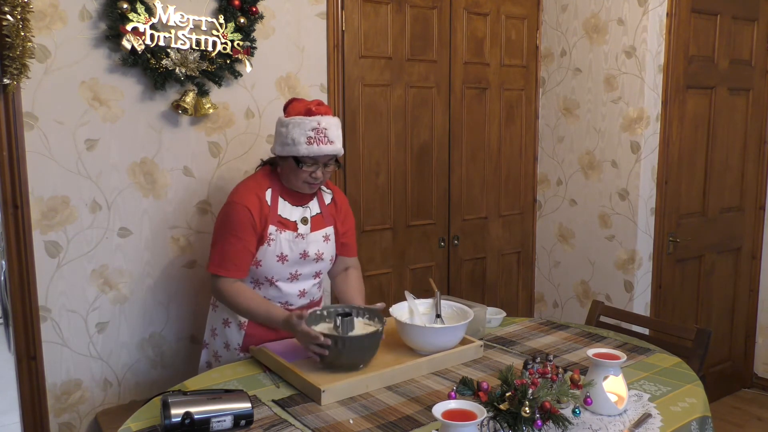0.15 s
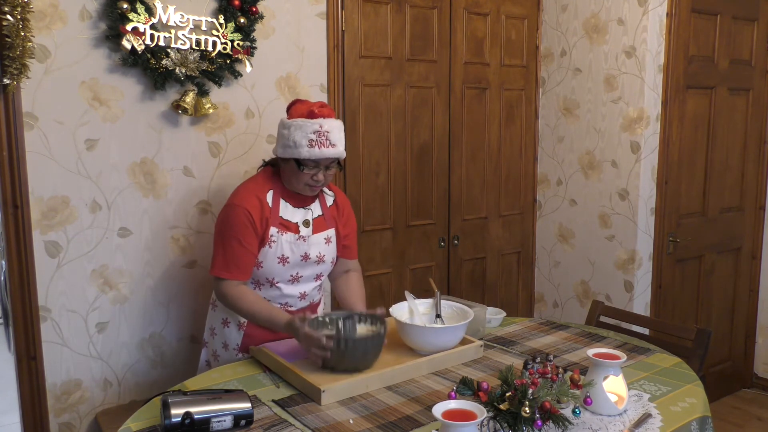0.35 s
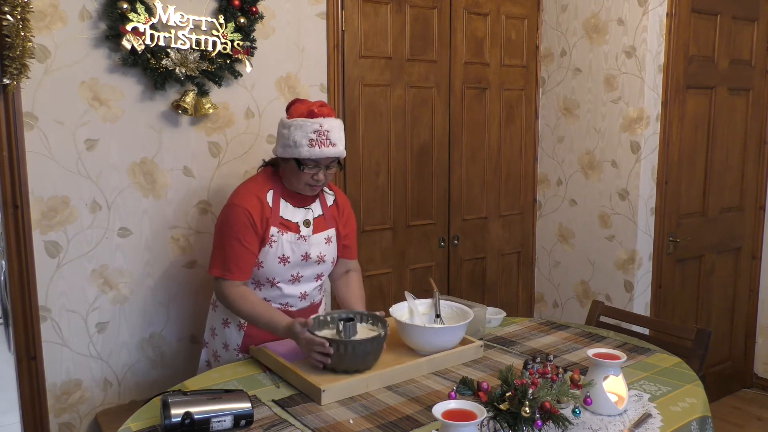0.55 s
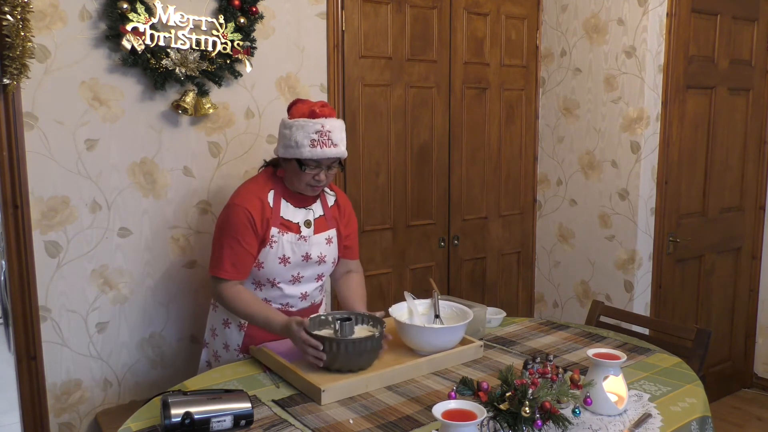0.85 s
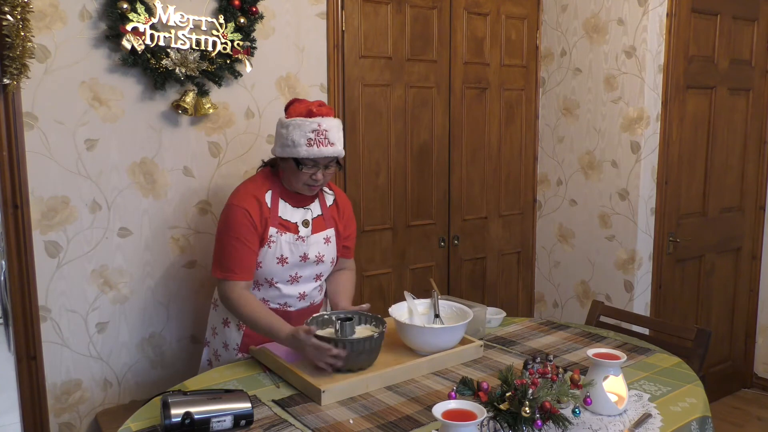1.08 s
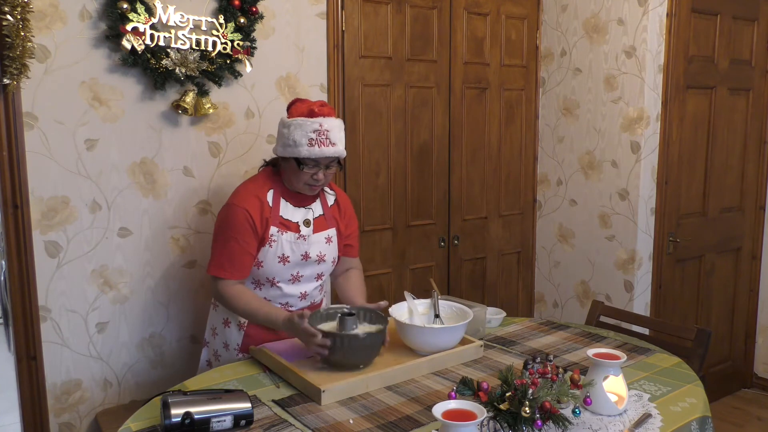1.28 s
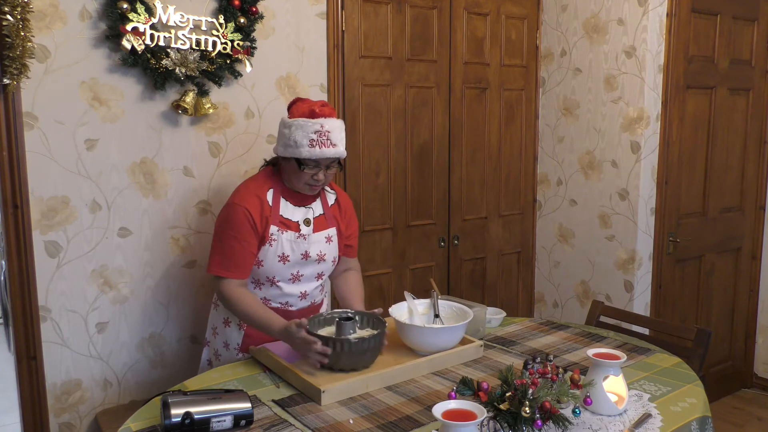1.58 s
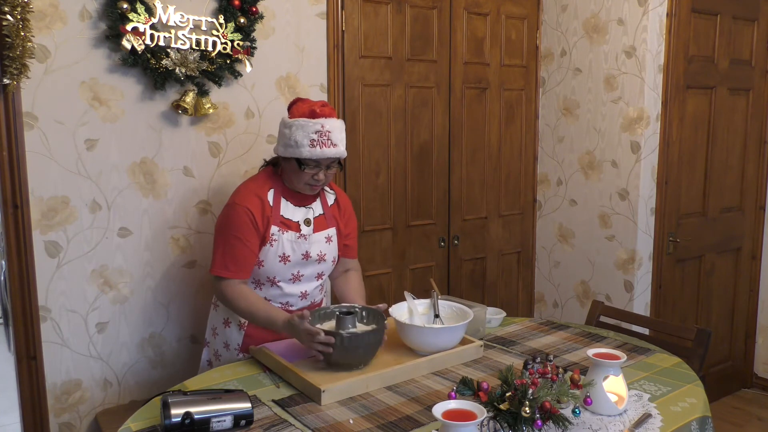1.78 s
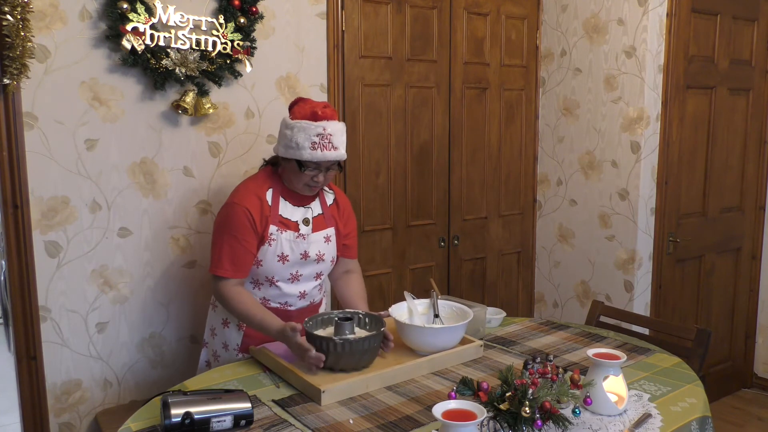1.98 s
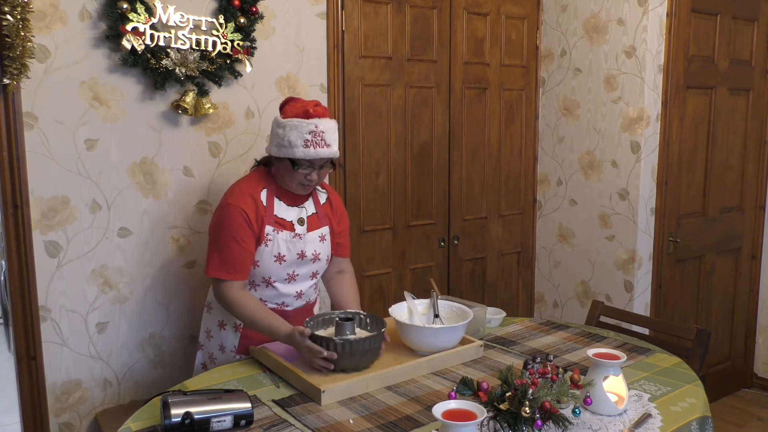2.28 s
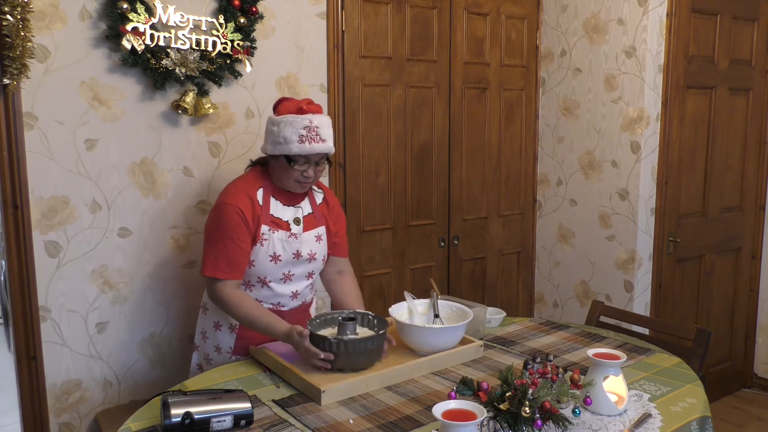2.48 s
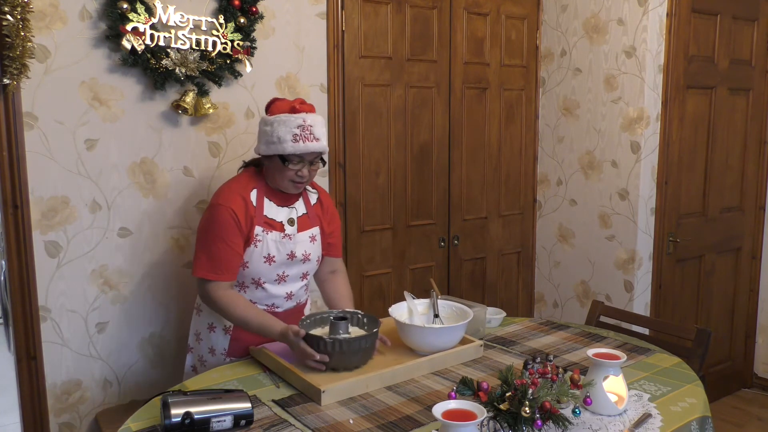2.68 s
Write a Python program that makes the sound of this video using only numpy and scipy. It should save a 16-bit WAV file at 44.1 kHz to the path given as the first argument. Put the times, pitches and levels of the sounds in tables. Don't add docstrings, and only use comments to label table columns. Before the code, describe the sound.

A batter-filled metal pan knocks four times on a wooden board in a quiet kitchen

```python
import sys
import numpy as np
from scipy import signal
from scipy.fft import rfft, irfft
from scipy.io import wavfile
from scipy.ndimage import uniform_filter1d

SR = 44100
rng = np.random.default_rng(int(sys.argv[2]) if len(sys.argv) > 2 else 0)


def dump(signal):
    limited = np.clip(np.atleast_2d(signal).T, -1, 1)
    pcm = np.round(limited * 32767).astype(np.int16)
    wavfile.write(sys.argv[1], SR, pcm)


def invert_db(level):
    return 10 ** (np.asarray(level, dtype=float) / 20)


N = 125685

# frequency in Hz, level in dB, time to fall 60 dB in seconds.
TABLE_MODES = [(138, -11, 0.12), (186.1, -6, 0.096), (234, -4.5, 0.19), (266.6, -8, 0.12),
               (372.2, -6, 0.076)]
# frequency in Hz, level in dB, time to fall 60 dB in seconds.
BOARD_MODES = [(422, -3, 0.068), (480, -1, 0.035), (572, -12, 0.097), (661.2, 1.5, 0.0593), (703, 0, .09),
               (772.4, -1, 0.034), (817, -8.5, 0.15), (908, -3, 0.026), (990, -6.5, 0.047),
               (1126, -6.5, .04), (1247, -10, 0.09)]
# frequency in Hz, level in dB, time to fall 60 dB in seconds.
PAN_MODES = [(1407, -6.5, 0.02), (1510, -46, 0.012), (1640, -28.5, 0.016), (1965, -18.5, 0.045),
             (1972, -21.5, 0.038), (2460, -6, 0.02), (2630, -14.5, 0.018), (3200, -13, .015),
             (3710, -16, .015), (4500, -25, 0.016), (4570, -45.5, .015), (5000, -40.5, .012)]


def read(points, hz):
    f, value = np.transpose(points)
    return np.interp(np.log(hz + 1), np.log(f + 1), value)


def evened(x):
    return x / np.sqrt(np.mean(x ** 2) + 1e-20)


def add(mix, s, sound):
    part = mix[round(s * SR):][:len(sound)]
    part += sound[:len(part)]


def coloured(x, points):
    n = x.shape[-1]
    gain = invert_db(read(points, np.fft.rfftfreq(n, 1 / SR)))
    return irfft(rfft(x) * gain, n)


def with_likeness(left, other, same):
    same = np.clip(same, 0, 1)
    return same * left + np.sqrt(1 - same ** 2) * other


def air():
    # frequency in Hz, level in dB.
    hiss_spectrum = [(35, -11.5), (60, 0), (250, -3), (460, -10.5), (700, -12.5), (3000, -26), (9000, -34),
                     (16000, -42.5)]
    # frequency in Hz, share from 0 to 1.
    likeness = [(50, 0.12), (200, 0.23), (1000, 0.17), (4000, 0.1), (12000, .1)]
    # time in seconds, level in dB.
    draught = [(0, -46), (.3, -51), (.42, -24), (.56, -36.5), (.9, -34), (1.25, -46.5), (1.55, -38),
               (2.1, -41.5), (2.85, -46)]
    hiss_db, draught_hz, draught_left_db = -44.5, 47, 5.5
    hz = np.fft.rfftfreq(N, 1 / SR)

    left, other = rfft(rng.standard_normal((2, N)))
    pair = np.array([left, with_likeness(left, other, read(likeness, hz))])
    hiss = irfft(pair * invert_db(read(hiss_spectrum, hz)) * (hz > 50), N)

    low = rfft(rng.standard_normal((2, N))) / (1 + (hz / draught_hz) ** 3)
    low = irfft(low * (hz > 12), N)
    low[1] = 0.00014 * low[0] + 1.2 * low[1]
    s, db = np.transpose(draught)
    swell_db = np.interp(np.arange(N) / SR, s, db) - 4
    side_db = np.array([[draught_left_db], [-draught_left_db]])
    return invert_db(hiss_db) * evened(hiss) + evened(low) * invert_db(swell_db + side_db)


def rustles():
    # start in seconds, rise in seconds, time to fall 60 dB in seconds, level in dB.
    brushes = [(.01, 0.013, 0.46, -57), (0.098, 0.013, 0.35, -58.5), (0.259, 0.035, .3, -57.5),
               (.392, 0.0026, 0.19, -35), (1.039, 0.0076, 0.096, -36), (1.56, 0.011, .4, -54),
               (2.14, 0.035, 0.62, -58.5), (2.3, 0.056, 0.46, -55), (2.438, 0.0098, 0.9, -56.5),
               (2.724, 0.015, 0.43, -46), (2.58, 0.011, 0.64, -52.5), (2.8, 0.021, 0.36, -58)]
    # frequency in Hz, level in dB.
    friction = [(880, -22.5), (1500, -11.5), (2100, -2), (3000, -3), (4200, -1), (5800, -4.5), (9000, -8.5),
                (16000, -30)]
    t, level = np.arange(N) / SR, np.zeros(N)
    for start, rise, t60, db in brushes:
        since = np.maximum(t - start, 0)
        fall_db = 60 * np.maximum(since - rise, 0) / t60
        level += invert_db(db - fall_db) * np.minimum(since / rise, 1)
    lumps = evened(uniform_filter1d(rng.standard_normal(N), size=150))
    grains = rng.standard_normal(N) * invert_db(0.83 * lumps)
    return level * evened(coloured(grains, friction))


def ring(modes, spot):
    spot_db, ring_cycles, longest_s = 1.0, 60, 0.11
    t = np.arange(5000) / SR
    out = np.zeros(len(t))
    for k, ((hz, db, t60), share) in enumerate(zip(modes, spot)):
        damped_t60 = min(t60, ring_cycles / hz, longest_s)
        level = invert_db(db + spot_db * share - 60 * t / damped_t60)
        out += (-1) ** k * level * np.sin(2 * np.pi * hz * t)
    return out


def tap(strength_db, boom_db, clack_db, favoured_hz):
    # frequency in Hz, level in dB.
    crack_spectrum = [(500, 17.5), (1500, 10.5), (3000, -0.5), (5500, -10), (8000, -17.5), (12000, -32),
                      (16000, -60)]
    tap_db, push_db, pan_db, pan_room_db = 5.5, 0, 0, -15.5
    crack_db, crack_s, rattle_db, rattle_s, click_db = -4, 0.011, -6, 0.035, 21
    favour_db, favour_octaves = 5, 0.12
    contact_ms, softer_ms_per_db = 0.95, 0.02

    spot = rng.standard_normal((3, 14))
    for row, modes in zip(spot, (TABLE_MODES, BOARD_MODES)):
        octaves_off = np.log2(np.array(modes)[:, 0] / favoured_hz)
        row[:len(modes)] += favour_db * np.exp(-(octaves_off / favour_octaves) ** 2)

    blow_ms = contact_ms - softer_ms_per_db * strength_db
    blow = np.sin(np.pi * np.arange(0, 1, 1000 / (blow_ms * SR))) ** 2
    wood = invert_db(boom_db) * ring(TABLE_MODES, spot[0]) - ring(BOARD_MODES, spot[1])
    wood = np.convolve(wood, blow / blow.sum())[:len(wood)]
    wood[:2 * len(blow)] += invert_db(push_db) * np.r_[blow, -blow]

    t = np.arange(len(wood)) / SR
    burst = np.exp(-t / crack_s) + invert_db(rattle_db) * np.exp(-t / rattle_s)
    burst = burst * np.minimum(t / 0.00012, 1)
    crack = evened(coloured(rng.standard_normal(len(t)), crack_spectrum)) * burst
    click = coloured(1. * (np.arange(len(t)) == 100), crack_spectrum)
    click = click / np.linalg.norm(click)
    pan = invert_db(pan_db) * ring(PAN_MODES, spot[2])

    ahead = wood + invert_db(clack_db) * (pan + invert_db(crack_db) * crack)
    around = wood + invert_db(clack_db) * (invert_db(pan_room_db) * pan + invert_db(click_db) * click)
    return invert_db(tap_db + strength_db) * np.array([ahead, around])


def drags():
    # start in seconds, length in seconds, level in dB, loudest Hz.
    slides = [
        (0.822, 0.083, -28, 750),
        (1.383, 0.08, -30, 450),
        (1.578, 0.042, -39, 484),
        (2.228, 0.072, -47, 450),
        (2.299, 0.12, -44.5, 685),
        (2.457, 0.083, -28, 388),
        (2.57, 0.013, -16.5, 727),
        (2.579, 0.071, -26.5, 885),
        (2.64, 0.055, -29.5, 420),
        (0.432, 0.058, -23.5, 700),
    ]
    slips_per_s, db_per_octave = 2000, -6.5
    t, out = np.arange(N) / SR, np.zeros(N)
    slipping = rng.random(N) < slips_per_s / SR
    size = invert_db(1.3 * rng.exponential(1, N))
    slips = evened(slipping * size * rng.choice([-1., 1.], N))
    for start, length, db, top_hz in slides:
        edge = np.minimum(t - start, start + length - t) / (0.17 * length)
        force = invert_db(db) * np.clip(edge, 0, 1)
        modes = [(hz, level + db_per_octave * abs(np.log2(hz / top_hz)), t60)
                 for hz, level, t60 in [*TABLE_MODES, *BOARD_MODES, *PAN_MODES[:6]]]
        body = ring(modes, np.zeros(30))
        body = body / np.linalg.norm(body)
        on = force > 0
        add(out, start, signal.fftconvolve((force * slips)[on], body))
    return out


def tail():
    # frequency in Hz, time to fall 60 dB in seconds.
    decay = [(100, 0.77), (250, 0.44), (700, 0.37), (2000, 0.55), (5000, 0.54), (10000, 0.067)]
    # frequency in Hz, level in dB.
    tone = [(100, 0.5), (300, 6.5), (1000, 15), (3000, 8), (6000, 10), (12000, -7)]
    reflections = np.zeros((2, SR))
    at = np.arange(200, SR - 20, 20) + rng.integers(0, 20, (2, (SR - 201) // 20))
    np.put_along_axis(reflections, at, rng.choice([-1., 1.], at.shape), 1)
    reflections[1] = with_likeness(reflections[0], reflections[1], 0.49)
    hz, t, z = signal.stft(reflections, SR, nperseg=256)
    level_db = read(tone, hz)[:, None] - 60 * t / read(decay, hz)[:, None]
    z = z * invert_db(level_db) * np.minimum(t / 0.0054, 1)
    out = signal.istft(z, SR, nperseg=256)[1]
    return out / np.linalg.norm(out[0])


def kitchen(x, sent):
    # delay in milliseconds, level in dB.
    echoes = [(3.6, -13), (7.6, -14), (11, -10), (16, -8), (23, -22.5)]
    room_db = -7
    out = np.array([invert_db(4.0) * x, invert_db(1.5) * np.roll(x, shift=2)])
    for k, (ms, db) in enumerate(echoes):
        delay = round(ms * SR / 1000)
        late_sides = (k % 2, 1 - k % 2)
        out = out + invert_db(db) * np.array([np.roll(x, delay + 9 * side) for side in late_sides])
    turn = np.arange(N) / SR / 1.5
    for k in range(3):
        fed = sent * np.sqrt(2 / 3) * np.cos(np.pi * (turn - k / 3))
        out = out + invert_db(room_db) * signal.fftconvolve(fed[None], tail(), axes=1)[:, :N]
    return out


def scene():
    # start in seconds, strength in dB, table boom in dB, pan clack in dB,
    # favoured mode in Hz.
    knocks = [(.3185, -0.5, -1, -6, 357), (0.6908, 0.5, 1.5, -7.5, 641), (1.2652, -2, -1, -5, 432),
              (1.7880, -1, -1, -8, 179.5), (2.4744, -31.5, -2.5, -24, 430), (2.5750, -21, 1.5, -15, 188),
              (2.581, -19.5, 4.5, -29, 1000), (1.589, -41, 3, -17, 480), (1.046, -42, 5.5, -11, 233),
              (1.073, -40.5, -22, -6, 230), (1.093, -46.5, 7.5, -16, 227)]
    drag_room_db, low_cut_hz = -2, 79
    background, brushing, sliding = air(), rustles(), drags()
    near = brushing + sliding
    sent = brushing + invert_db(drag_room_db) * sliding
    for s, *blow in knocks:
        ahead, around = tap(*blow)
        add(near, s, ahead)
        add(sent, s, around)
    low_cut = signal.butter(2, low_cut_hz, "high", fs=SR, output="sos")
    near, sent = signal.sosfilt(low_cut, [near, sent])
    return kitchen(near, sent) + background


def roll_off(x):
    return signal.sosfilt(signal.butter(12, 16800, fs=SR, output="sos"), x)


def record(dry):
    limit_db, squeeze, grab_s, recover_db_per_s = -11, 0.71, 0.0019, 138
    ceiling, top_hz = 1.0, 15500
    power = uniform_filter1d((dry ** 2).mean(0), size=60, origin=15)
    power_db = 10 * np.log10(abs(power) + 1e-12)
    fall = np.arange(N) * recover_db_per_s / SR
    held_db = np.maximum.accumulate(power_db + fall) - fall
    over_db = np.maximum(held_db - limit_db, 0)
    r = np.exp(-1 / (grab_s * SR))
    held = dry / invert_db(squeeze * signal.lfilter([1 - r], [1, -r], over_db))
    clipped = ceiling * np.tanh(held / ceiling)
    dulled = signal.sosfilt(signal.butter(2, top_hz, fs=SR, output="sos"), clipped)
    return roll_off(dulled)


dry = scene()
out = record(dry)
dump(out)
```